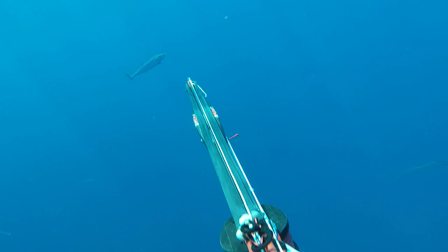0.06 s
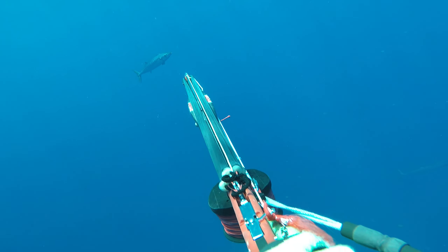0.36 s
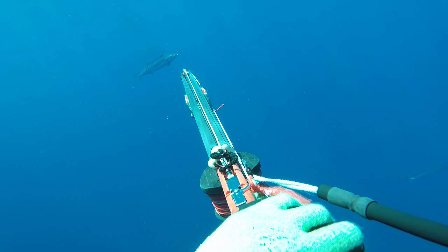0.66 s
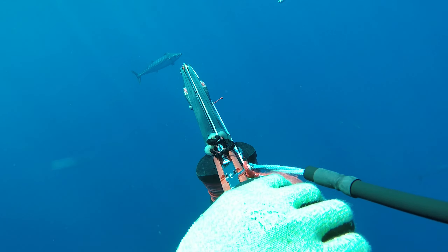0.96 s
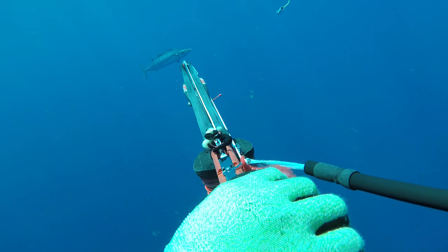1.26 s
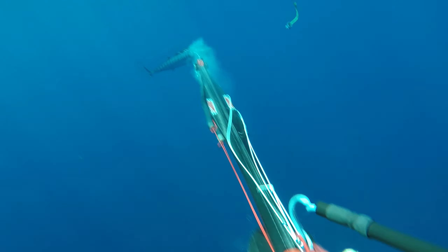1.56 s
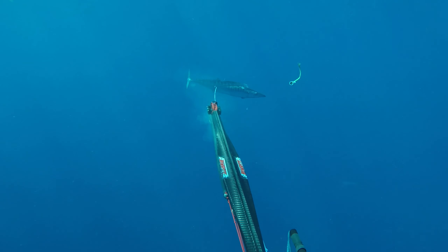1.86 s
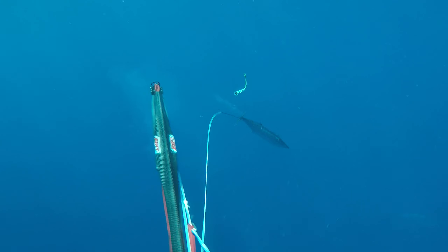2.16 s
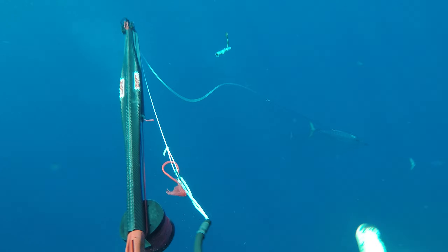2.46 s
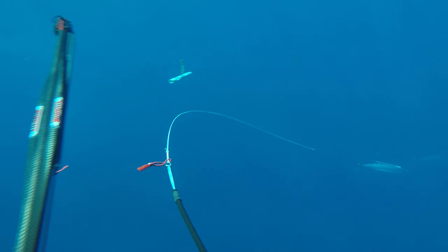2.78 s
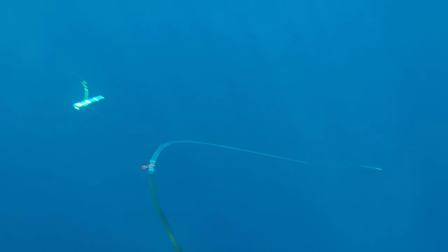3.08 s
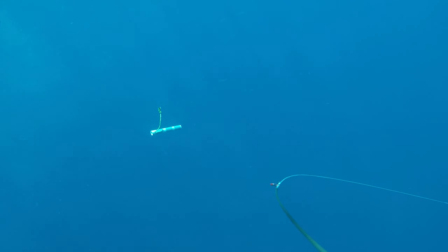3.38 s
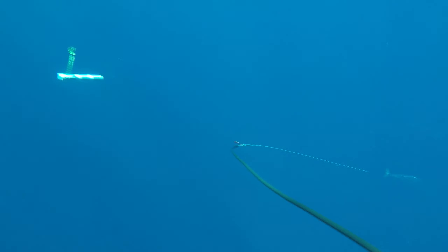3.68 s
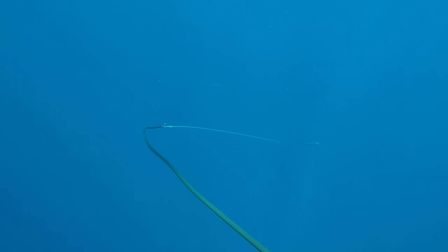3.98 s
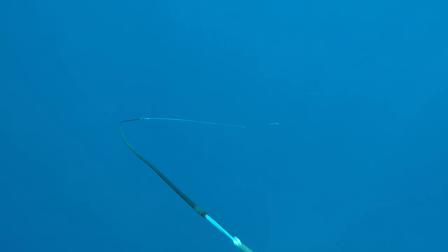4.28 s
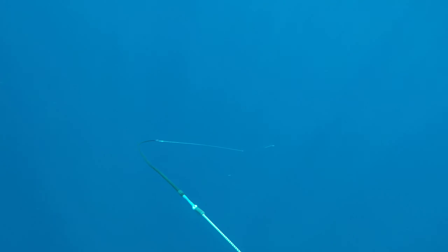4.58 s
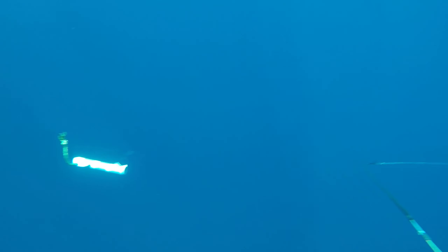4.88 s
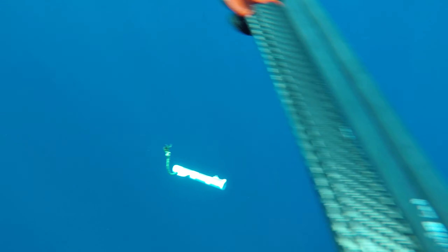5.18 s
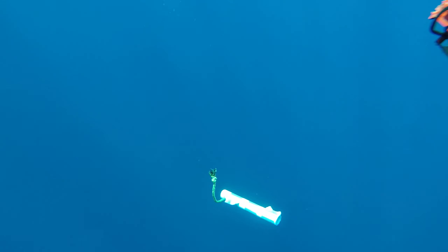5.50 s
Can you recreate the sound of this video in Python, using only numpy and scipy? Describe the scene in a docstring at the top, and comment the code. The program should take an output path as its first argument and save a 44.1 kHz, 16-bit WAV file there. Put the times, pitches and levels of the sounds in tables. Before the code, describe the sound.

Over low water rumble and fine crackle, a speargun snaps off a shot, followed by knocks, clinks and jerky rubbing from running line.

```python
"""A band speargun fires under water, heard through the two ports of a watertight housing close behind it.
Over rumbling water, fine crackle and lone pops the trigger clicks; at 1.5 s the spear rasps down its rail.
The shooting line hums out, snaps taut and rustles slack, and loose gear knocks on the barrel.
From 3.8 s the float line runs past in jerks, rubbing and clinking, as the image narrows to one port."""
import sys
import numpy as np
from scipy import signal
from scipy.fft import rfft, irfft
from scipy.io import wavfile
from scipy.ndimage import uniform_filter1d, minimum_filter1d

SR = 44100
rng = np.random.default_rng(int(sys.argv[2]) if len(sys.argv) > 2 else 0)


def waveform_to_disk(signal):
    """Save audio, clipped to [-1, 1], as 16-bit WAV at the path in sys.argv[1]."""
    frames = np.transpose(np.atleast_2d(signal))
    scaled = np.clip(frames, -1, 1) * 32767
    samples = np.round(scaled).astype(np.int16)
    wavfile.write(sys.argv[1], SR, samples)


N = 244314
TIME = np.arange(N) / SR
AGE = np.arange(8192) / SR  # seconds since a hit
SIDE = np.array([[1], [-1]])  # left, right
FIRE_S, TRAVEL_S = 1.498, 0.063  # the spear's release and its time on the rail

# blows on the barrel: start_s, thud_db, crack_db, crack_top_hz, flex_ms, left_minus_right_db
KNOCKS = [(1.4982, -4, -13, 3020, 11.2, 1), (1.558, -8.5, -14, 1480, 6.8, -2),
          (1.5832, -14.5, -16, 1200, 4.8, -3), (2.2403, -19.5, -29.5, 1700, 1.6, 0),
          (2.254, -9, -31, 1243, 7.9, 3.5), (3.2241, -3, -5.5, 2130, 6.4, 3.5),
          (3.4074, 0.5, -14.5, 1980, 6.45, 3), (3.468, -10, -28, 2120, 8.6, 3.5),
          (3.543, -14.5, -33, 2400, 11.4, 14), (3.7618, -8.5, -22.5, 2030, 6.8, -3.5),
          (4.3133, -4.5, -23.5, 900, 3.54, 0.5), (4.4736, 2, -19, 1130, 4.9, 7),
          (4.625, -9, -20, 890, 6.8, -4.5), (4.923, -2.5, -15.5, 2080, 5.3, -4.5)]


def undb(db):
    """Decibels to amplitude."""
    return np.exp(np.asarray(db) * np.log(10) / 20)


def unit(x):
    """Scale to rms 1."""
    return x / np.sqrt(np.mean(x ** 2))


def peak(x, db):
    """Scale a hit so that its loudest two milliseconds have this level."""
    power = uniform_filter1d(np.mean(np.atleast_2d(x) ** 2, axis=0), SR // 500)
    return x * undb(db) / np.sqrt(power.max())


def band(x, lo_hz, hi_hz, order=2):
    """Band-pass filter."""
    sos = signal.butter(order, [lo_hz, min(hi_hz, SR / 2 - 1)], "band", fs=SR, output="sos")
    return signal.sosfilt(sos, x)


def band_noise(lo_hz, hi_hz, samples=N):
    """One band of noise at rms 1."""
    return unit(band(rng.standard_normal(samples), lo_hz, hi_hz))


def colour(x, points):
    """EQ a steady sound through (freq_hz, gain_db) points, to rms 1."""
    hz, db = np.transpose(points)
    log_hz = np.log(np.arange(N // 2 + 1) * SR / N + 1)
    gain_db = np.interp(log_hz, np.log(hz), db, left=-90, right=-90)
    return unit(irfft(rfft(x) * undb(gain_db), N))


def ramp(start_s, rise_s):
    """A straight rise from 0 to 1."""
    return np.clip((TIME - start_s) / rise_s, 0, 1)


def held(start_s, length_s, rise_s, fade_s):
    """An envelope that rises, holds to the end of its length and dies away."""
    out = np.zeros(N)
    span = slice(int(start_s * SR), int((start_s + length_s + 10 * fade_s) * SR))
    age = TIME[span] - start_s
    out[span] = np.clip(age / rise_s, 0, 1) * np.exp(-np.maximum(age - length_s, 0) / fade_s)
    return out


def strokes(rows, rise_s, fade_s, swell_share=0.38):
    """One envelope per (start_s, length_s, level_db); long strokes swell over a share of their length."""
    return sum(undb(db) * held(start_s, length_s, max(rise_s, swell_share * length_s), fade_s)
               for start_s, length_s, db in rows)


def add(out, start_s, x):
    """Mix a hit into both channels."""
    i = int(start_s * SR)
    out[:, i:i + x.shape[-1]] += x[..., :N - i]


def ports(pair, apart):
    """Left and right from a shared and an opposed part."""
    return pair[0] + apart * SIDE * pair[1]


def out_of_step(pair, radians):
    """Sound carried by the barrel moves the ports out of step; the left lags by this phase."""
    return np.array([irfft(rfft(pair[0]) * np.exp(-1j * radians), pair.shape[1]), pair[1]])


def grains(per_s, spread_db):
    """Random tiny impacts: mostly small, now and then a large one."""
    size = undb(spread_db * np.minimum(rng.exponential(size=N), 4))
    return unit((rng.random(N) < per_s / SR) * size * rng.choice([-1, 1], N))


def scatter(x, smear_ms):
    """Each port hears an impact by its own brief cluster of paths."""
    paths = rng.standard_normal((2, len(AGE))) * np.exp(-AGE * 1000 / smear_ms)
    spectrum = rfft(paths)
    flatter = irfft(spectrum / np.sqrt(np.abs(spectrum) + 1e-9))
    return unit(signal.fftconvolve(x[None], flatter[:, :len(AGE) // 2], axes=1)[:, :N])


def ring(hz, t60, glide=0):
    """A damped mode whose pitch drifts by the share `glide` over its life."""
    return np.sin(2 * np.pi * hz * AGE * (1 + glide * AGE / t60 / 2)) * np.exp(-np.log(1000) * AGE / t60)


def contact(ms, apart, tail_db, tail_s):
    """A gritty burst of force that builds and dies, followed by faint rattling."""
    life = AGE * 1000 / ms
    force = (1 - np.exp(-3 * life)) * (np.exp(-life) + undb(tail_db) * np.exp(-AGE / tail_s))
    return ports(rng.standard_normal((2, len(AGE))), apart) * force


def housing(x, wall_hz=8700):
    """The housing's resonances move the two ports out of step, and its wall stops the top."""
    # resonances: pitch_hz, width_hz, gain_db, left_lead_rad
    modes = [(427, 110, -5, 3.9), (965, 90, -4, 3), (1390, 43, -18, 4), (1673, 160, 7.5, 2.5),
             (2430, 680, -7.5, 2), (2750, 1000, -11, 6), (4100, 890, -9, 0), (5300, 410, -6, 1.3),
             (8000, 700, -40.5, -3), (8500, 7800, -28.5, 15)]
    response = sum(undb(db) * width * np.exp(-np.pi * width * AGE)
                   * np.cos(2 * np.pi * hz * AGE + SIDE * lead / 2) for hz, width, db, lead in modes)
    response = band(response, 170, wall_hz, order=4) * undb(-2 * SIDE)
    return signal.fftconvolve(x, response, axes=1)[:, :x.shape[-1]]


def line_run():
    """How hard the float line runs past the gun, 0 to 1."""
    return held(3.807, length_s=1.48, rise_s=0.64, fade_s=1)


def sea_crackle():
    """A bed of hiss and clustered crackle that ducks at the shot and creeps part of the way back."""
    # crackle EQ: freq_hz, gain_db
    fizz_eq = [(300, 4.5), (700, -5), (1250, -9.5), (1720, -4.5), (2150, -12), (2850, -9.5), (3300, -17.5),
               (3800, -11), (4600, -13), (5450, -4), (6300, -13.5), (7400, -9), (9200, -13), (11000, -19),
               (15500, -29.5)]
    clusters = undb(4 * band_noise(8, 30))
    ticks = scatter(grains(per_s=300, spread_db=4), smear_ms=1.5)
    crackle = unit(band(ticks, 1400, 12000) * clusters)
    fizz = colour(rng.standard_normal((2, N)) + undb(-3.5) * crackle, fizz_eq)
    before_db = -51.5
    after_db = np.clip(-70 + 14 * (TIME - 2.5), -70, -66)
    fader_db = before_db + (after_db - before_db) * ramp(FIRE_S, 0.054)
    return fizz * undb(fader_db) * undb([[1.5], [6]])  # leans right


def moving_water():
    """Lumpy pressure surges, and eddies stirred by the flow, the knocks and the running line."""
    # water streaming round the housing as the diver moves: time_s, level_db
    flow = [(0, -22), (0.9, -18), (1.45, -18), (1.68, -20.5), (1.95, -40.5), (2.25, -30), (2.9, -33),
            (3.3, -23.5), (3.53, -21.5), (3.63, -33.5), (4.0, -30), (4.3, -27.5), (4.85, -13.5),
            (5.05, -21), (5.54, -20.5)]
    # surge EQ: freq_hz, gain_db
    surge_eq = [(12, 2), (26, 3), (50, -7), (85, -15.5), (130, -20.5), (250, -54.5)]
    # eddy EQ: freq_hz, gain_db
    eddy_eq = [(50, -18), (100, 6), (165, 1.5), (240, -13.5), (400, -18), (700, -32.5), (1300, -34),
               (3000, -63.5)]
    pressure, eddies = (ports(rng.standard_normal((2, N)), apart=0.22) for _ in range(2))
    lumps = undb(2 * band_noise(6.8, 11.4))
    flow_db = np.interp(TIME, *np.transpose(flow))
    surge = colour(pressure * lumps, surge_eq) * undb(flow_db - 1)
    by_flow = undb(-28 + 0.57 * flow_db)
    by_knocks = sum(undb(thud_db - 23.5) * held(start_s, 0, rise_s=0.014, fade_s=0.056)
                    for start_s, thud_db, *_ in KNOCKS)
    by_line = undb(-27.5) * line_run()
    return surge + colour(eddies * lumps, eddy_eq) * np.sqrt(by_flow ** 2 + by_knocks ** 2 + by_line ** 2)


def gulps_and_wobbles():
    """Small gulps rise in pitch; low wobbles swell and die within a few cycles."""
    # gulps of water round the gear: start_s, level_db, pitch_hz
    gulps = [(0.483, -36.5, 406), (0.915, -30.5, 357), (0.933, -45, 283), (0.958, -42, 387),
             (2.289, -41, 377), (2.633, -38.5, 395), (2.857, -44.5, 280), (3.114, -31.5, 402)]
    # rubber bands flapping at the shot, later bloops of water and air: start_s, pitch_hz, level_db, length_s
    wobbles = [(1.47, 93.5, -11.5, 0.027), (1.556, 124, -8.5, 0.027), (1.59, 156, -21.5, 0.016),
               (1.75, 142, -20.5, 0.025), (3.23, 203, -17, 0.031), (4.451, 194.4, -16, 0.032),
               (4.48, 184, -21, 0.034), (5.416, 219, -5, 0.019), (5.423, 245.4, 0, 0.022),
               (5.43, 165, -7, 0.026)]
    out = np.zeros((2, N))
    for start_s, db, hz in gulps:
        attack = 1 - np.exp(-AGE / 0.00078)
        add(out, start_s, peak(ring(hz, t60=0.025, glide=0.42) * attack, db))
    for start_s, hz, db, length_s in wobbles:
        swell = np.sin(np.pi * np.minimum(AGE / length_s, 1)) ** 2
        add(out, start_s, undb(db) * np.sin(2 * np.pi * hz * AGE) * swell)
    return out


def clinks():
    """Metal fittings and small bubbles give brief, rough pings that bend a little upward."""
    # pings: start_s, pitch_hz, level_db, t60_s
    pings = [(1.468, 1715, -11.5, 0.047), (1.498, 1444, -9, 0.045), (1.586, 1640, -5, 0.017),
             (2.2413, 1705, -2.5, 0.016), (2.36, 1640, -30, 0.042), (3.2, 1420, -20.5, 0.034),
             (3.802, 5470, -36, 0.097), (3.818, 5800, -7, 0.0072), (3.852, 2790, -25, 0.026),
             (4.410, 983, -16, 0.12), (4.410, 3150, -19, 0.021), (4.427, 1080, -33, 0.069),
             (4.427, 1616, -16, 0.027), (4.531, 1041, -23, 0.093), (4.531, 2340, -31, .045),
             (4.903, 870, -25, 0.083), (4.922, 762, -18.5, 0.045), (4.907, 6800, -33.5, 0.05),
             (5.264, 6700, -33, 0.049)]
    out = np.zeros((2, N))
    attack = 1 - np.exp(-AGE / 0.00031)
    for start_s, hz, db, t60 in pings:
        roughness = 1 + 0.045 * band_noise(40, 300, len(AGE))
        add(out, start_s, undb(db) * ring(hz, t60, glide=0.019) * attack * roughness)
    return out


def float_line_jerks():
    """The float line catches and slips, thumping the gun with a short scuff."""
    # catches of the line: start_s, relative_db
    jerks = [(4.116, -38), (4.194, -33.5), (4.262, -34.5), (4.396, -39), (4.452, -35), (4.667, -42),
             (4.727, -56), (4.792, -27), (4.862, -22), (4.986, -21.5), (5.051, -19), (5.109, -15),
             (5.173, -19), (5.236, -23), (5.297, -29)]
    # what they ring in the gun: pitch_hz, gain_db, t60_s
    gun_modes = [(87.4, 7.5, 0.25), (162.8, 1, 0.39), (317, 12, 0.094), (379, -3, 0.067), (580, -13, .03)]
    out = np.zeros((2, N))
    for start_s, db in jerks:
        chance = rng.standard_normal((len(gun_modes), 2))
        modes = sum(undb(mode_db + 2 * louder) * ring(hz * (1 + 0.041 * sharper), t60)
                    for (hz, mode_db, t60), (louder, sharper) in zip(gun_modes, chance))
        thump = band(modes, 13.5, 455, order=3)
        scuff = band(contact(ms=5.8, apart=0.091, tail_db=-19, tail_s=0.01), 128, 288, order=3)
        add(out, start_s, peak(thump, db + 5.5) + peak(scuff, db + 0.5))
    return out


def float_line_friction():
    """The float line rubs and hisses over the gun, flaring with each slide."""
    # slides: start_s, length_s, rub_db, hiss_db
    slides = [(4.24, 0.11, -50, -62), (4.35, 0.12, -50, -54.5), (4.47, 0.026, -29.5, -58),
              (4.607, 0.026, -31, -53), (4.67, 0.084, -41, -47), (4.755, 0.066, -40.5, -45.5),
              (4.89, 0.018, -46, -47), (5.11, 0.083, -45.5, -52), (5.38, 0.073, -46, -51)]
    # rub EQ: freq_hz, gain_db
    rub_eq = [(200, -3), (450, -1.5), (800, 5), (1200, -6), (1550, -1.5), (1800, 5.5), (2150, -12),
              (2450, -14), (3000, -21), (5000, -48), (9000, -48)]
    # hiss EQ: freq_hz, gain_db
    hiss_eq = [(1800, -4), (3000, -10), (4200, -8), (5300, 2.5), (6300, -3.5), (7200, 4.5), (8300, -5.5),
               (9400, -6.5), (11000, -14), (15000, -29)]
    friction = scatter(grains(per_s=1600, spread_db=1), smear_ms=0.37)
    start_s, length_s, rub_db, hiss_db = np.transpose(slides)
    rise_s, fade_s = 0.026, 0.0083
    rub = undb(-57) * line_run() + strokes(zip(start_s, length_s, rub_db), rise_s, fade_s)
    hiss = undb(-64) * line_run() + strokes(zip(start_s, length_s, hiss_db), rise_s, fade_s)
    return colour(friction, rub_eq) * rub + colour(friction, hiss_eq) * hiss


def shooting_line_hum(pitch_hz=138, rise_s=0.036, fade_s=0.025):
    """The shooting line flutters as the spear drags it out, swelling at each tug."""
    # tugs of the spear: start_s, length_s, level_db
    tugs = [(1.745, 0.059, -39), (1.995, 0.079, -46.5), (2.19, 0.093, -38.5)]
    flutter = band_noise(3.4, 19)
    tension = undb(-38) * held(1.73, 0.567, rise_s, fade_s) + strokes(tugs, rise_s, fade_s)
    return unit(flutter * np.sin(2 * np.pi * pitch_hz * TIME)) * tension


def shooting_line_friction(rise_s=0.0089):
    """The line scrapes through the muzzle as it slows, keeps the gun ringing, then rustles slack."""
    # soft hisses, the first click's tail and then the line brushing the gun: start_s, length_s, level_db
    brushes = [(0.2, 0.11, -47.5), (1.785, 0.037, -42.5), (2.18, 0.056, -46.5), (2.315, 0.021, -44),
               (3.29, 0.051, -50.5), (3.415, 0.047, -54), (3.51, 0.024, -53.5)]
    # brush EQ: freq_hz, gain_db
    brush_eq = [(250, -6), (600, -8), (1250, -8.5), (1560, -4), (1750, -3), (2150, -9.5), (2750, -9),
                (3500, -19), (4700, -20), (5400, -17), (6300, -32), (12000, -59.5)]
    fibres = scatter(grains(per_s=2900, spread_db=0), smear_ms=0.87)
    waver = undb(3 * band_noise(4, 25))
    exit_s = FIRE_S + TRAVEL_S
    scrape = undb(-50) * held(exit_s, 0, rise_s, fade_s=0.53) * waver
    slack = held(2.626, length_s=0.98, rise_s=0.096, fade_s=0.048) * waver
    muzzle_drag = undb(-58) * slack
    brush = colour(fibres, brush_eq) * (scrape + strokes(brushes, rise_s, fade_s=0.035) + muzzle_drag)
    gun_ring = unit(band(fibres, 1550, 1850)) * undb(-59) * held(exit_s, 0, rise_s, fade_s=2.2)
    rustle = unit(band(fibres, 2120, 3140)) * undb(-60.5) * slack
    return brush + gun_ring + rustle


def sharp_clicks(ring_hz=2470):
    """Sharp clicks heard through the housing: a bright snap, a short ring and a little body."""
    # trigger, spear and line contacts, plus a few lone pops of sea crackle before the shot:
    # start_s, snap_db, ring_db, burst_ms
    clicks = [(0.164, -33.5, -46, 1.5), (0.21, -24, -52, 0.99), (0.2151, -15, -31, 1.2),
              (0.6745, -33.5, -41, 3.4), (0.7358, -30, -43, 0.24), (0.764, -37.5, -47, 1),
              (0.9944, -35.5, -44, 0.31), (1.07, -35.5, -65, 1.7), (1.141, -35, -39, 1.2),
              (1.4652, -49, -20, 1.6), (1.496, -14, -10.5, 2.3), (1.5605, -20, -12, 1.3),
              (1.5837, -18, -13, 1.8), (1.6262, -23.5, -19, 0.58), (1.63, -28, -42, 3.7),
              (1.917, -47.5, -38.5, 10), (2.0007, -31.5, -25.5, 2.4), (2.058, -34.5, -31.5, 2.2),
              (2.1963, -36, -35, 0.23), (2.2389, -24.5, -15.5, 1.4), (2.3132, -40, -20.5, 0.99),
              (2.32, -32.5, -45, 2.1), (2.717, -43.5, -47, 1.4), (3.1984, -33, -16.5, 0.77),
              (3.8155, -17.5, -23, 1.36), (3.8522, -36.5, -47, 2.2), (4.9205, -25.5, -16, 2),
              (5.061, -35, -30.5, 2.2), (5.2664, -39.5, -39.5, 1.8)]
    out = np.zeros((2, N))
    for start_s, snap_db, ring_db, ms in clicks:
        hit = housing(contact(ms, apart=0.84, tail_db=-25.5, tail_s=0.009))
        snap = peak(band(hit, 2800, 9600, order=3), snap_db)
        ringing = peak(band(hit, ring_hz / 1.19, ring_hz * 1.45), ring_db)
        body = peak(band(hit, 250, 1100, order=3), ring_db - 19.5)
        add(out, start_s, snap + ringing + body)
    return out


def barrel_knocks():
    """A crack, then the barrel's bending wave: highs arrive first, so the thud falls in pitch."""
    out = np.zeros((2, N))
    for start_s, thud_db, crack_db, top_hz, flex_ms, pan_db in KNOCKS:
        flex = AGE * 1000 / flex_ms
        thud = np.sin(2 * np.pi * np.sqrt(flex)) * flex ** 1.05 * np.exp(-flex / 0.51)
        blow = contact(ms=1.9, apart=0.25, tail_db=-31.5, tail_s=0.0083)
        carried = band(out_of_step(blow, radians=1.92), 100, 4200, order=3)
        crack = peak(band(carried, 410, top_hz), crack_db)
        rattle = band(contact(ms=4.7, apart=0.16, tail_db=-21, tail_s=0.006), 258, 560)
        body = peak(thud, thud_db + 0.5) + peak(rattle, thud_db - 16)
        add(out, start_s, body * undb(SIDE * pan_db / 2) + crack)
    return out


def spear_shot(ring_hz=1720, width_hz=230, lead_rad=0.9, sag_db_per_s=149.5, stop_s=0.0019):
    """The shaft chatters along its rail and rings ever harder as it gains speed; the rubber bands flap."""
    # rail EQ: freq_hz, gain_db
    rail_eq = [(200, -0.5), (400, 5.5), (650, -14), (930, 4), (1150, -9.5), (1500, 0), (2450, 1.5),
               (2950, -6.5), (3300, -16.5), (4000, -9.5), (4750, -19), (5500, -6.5), (6100, -19.5),
               (9200, -20.5), (10500, -34.5), (14000, -45)]
    chatter = ports(scatter(grains(per_s=900, spread_db=2.5), smear_ms=0.4), apart=0.3)
    rasp = colour(out_of_step(chatter, radians=-1.25), rail_eq) * undb(-1.5 * SIDE)
    mode = np.exp(-np.pi * width_hz * AGE) * np.sin(2 * np.pi * ring_hz * AGE + SIDE * lead_rad / 2)
    shaft = unit(band(signal.fftconvolve(chatter[:1], mode, axes=1)[:, :N], 1500, 2700))
    flap = undb(-2) * band_noise(45, 210)
    push_db = -12.5 - sag_db_per_s * np.clip(TIME - FIRE_S, 0, TRAVEL_S)
    push = held(FIRE_S, TRAVEL_S, rise_s=0.018, fade_s=stop_s) * undb(push_db)
    speed = held(FIRE_S, TRAVEL_S, rise_s=0.029, fade_s=stop_s)
    return (rasp + flap) * push + undb(-14) * shaft * speed


def scene():
    """The gun, its gear and its two lines over the bed of the sea."""
    hits = sharp_clicks() + spear_shot() + barrel_knocks() + clinks()
    lines = float_line_jerks() + float_line_friction() + shooting_line_hum() + shooting_line_friction()
    return hits + lines + gulps_and_wobbles() + moving_water() + sea_crackle()


def record(dry):
    """The image narrows to the right port, a fast limiter holds the loudest peaks and the top is cut."""
    left = dry[0] + ramp(start_s=3.6, rise_s=0.55) * (dry[1] - dry[0])
    pair = np.array([left, dry[1]])
    headroom = 1 / np.maximum(np.abs(pair).max(axis=0), 1)
    gain = uniform_filter1d(minimum_filter1d(headroom, size=45), size=45)
    top_cut = signal.ellip(8, 0.2, 70, 15600, fs=SR, output="sos")
    return signal.sosfilt(top_cut, pair * gain)


dry = scene()
out = record(dry)
waveform_to_disk(out)
```